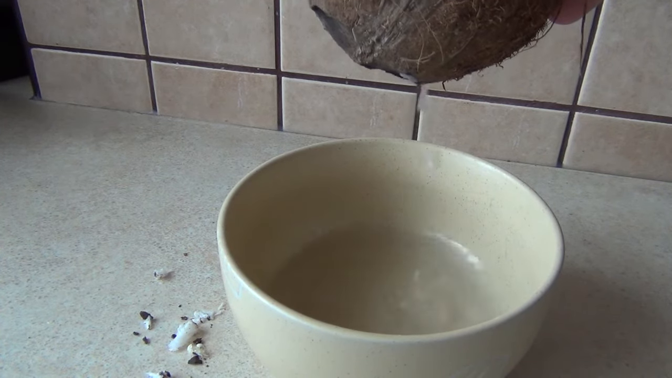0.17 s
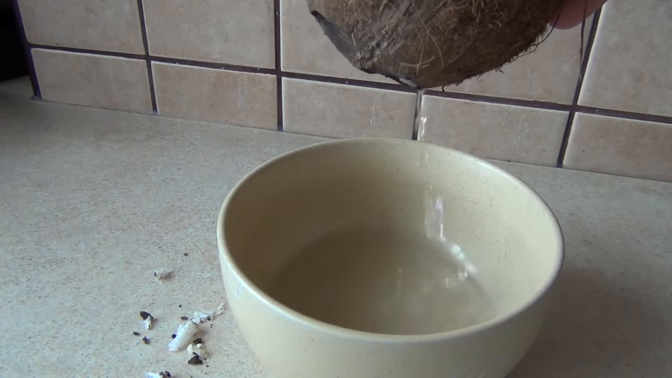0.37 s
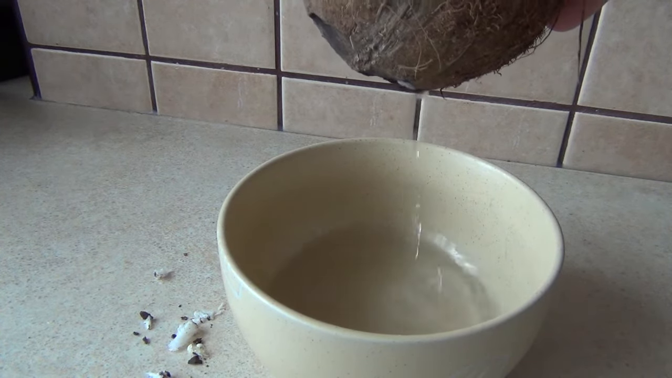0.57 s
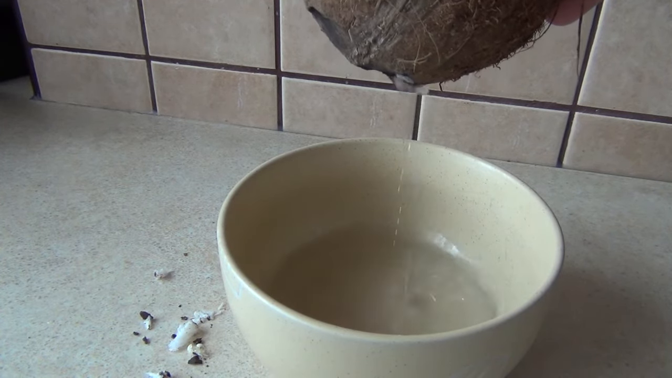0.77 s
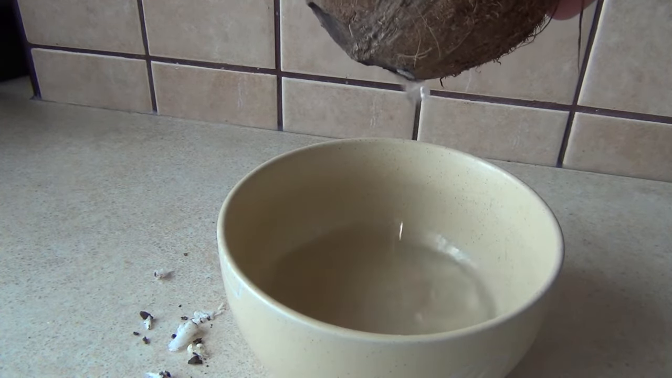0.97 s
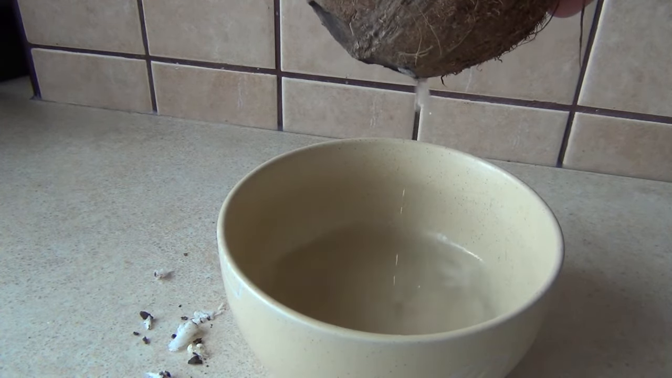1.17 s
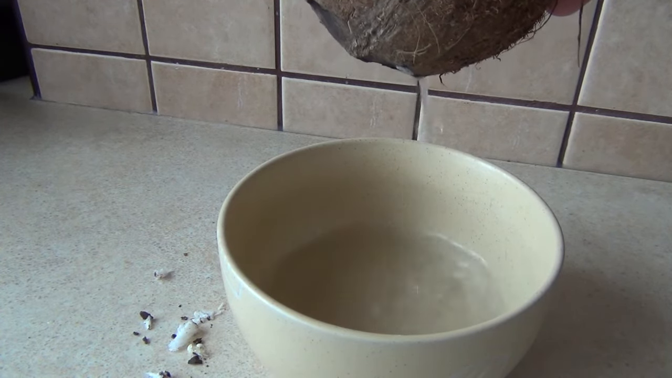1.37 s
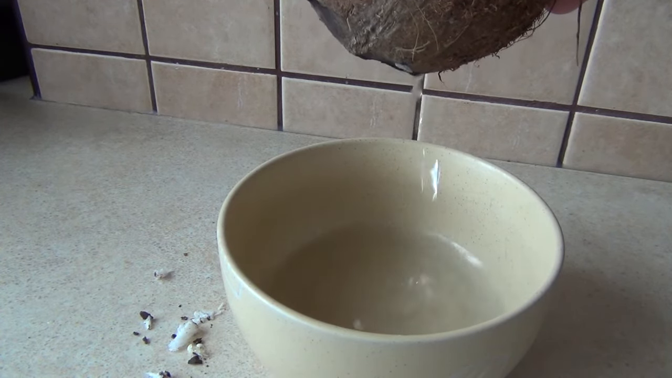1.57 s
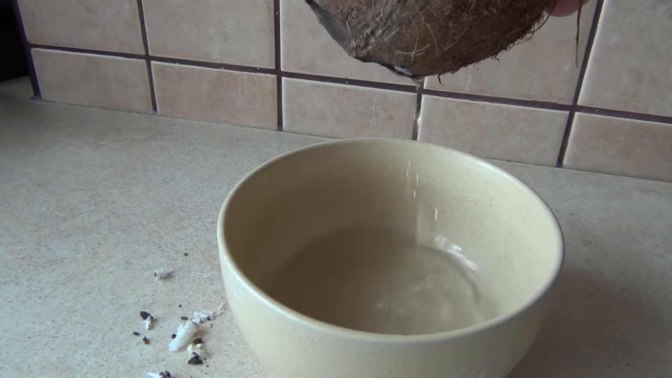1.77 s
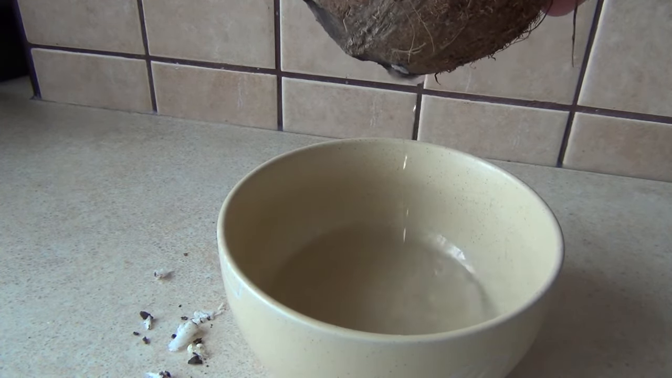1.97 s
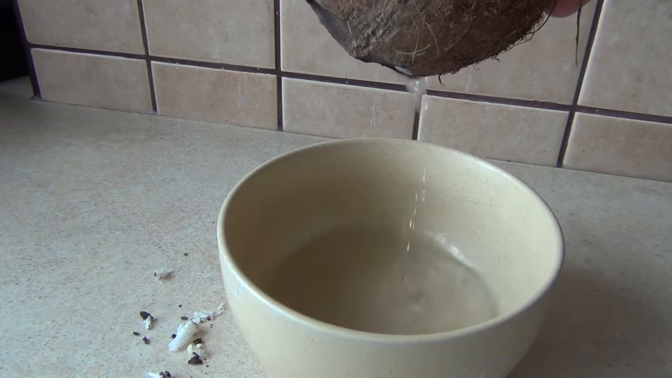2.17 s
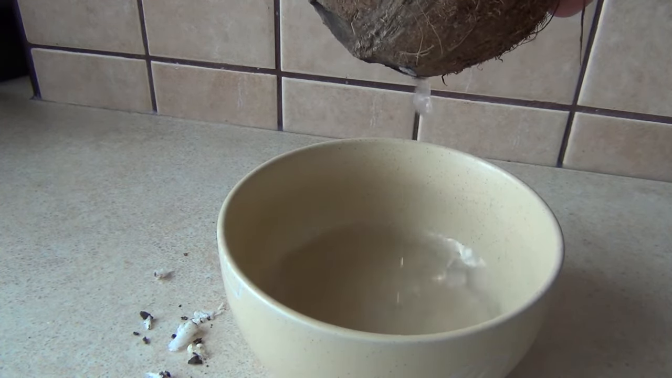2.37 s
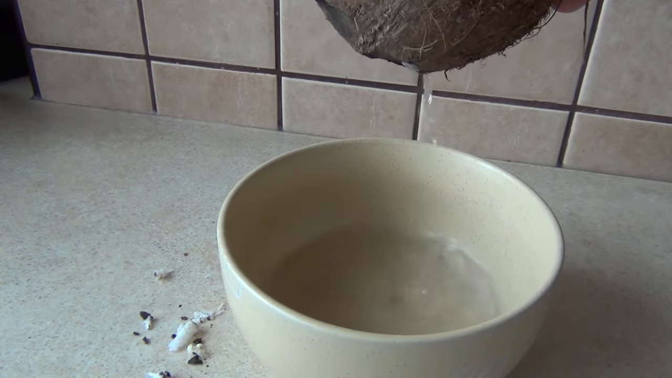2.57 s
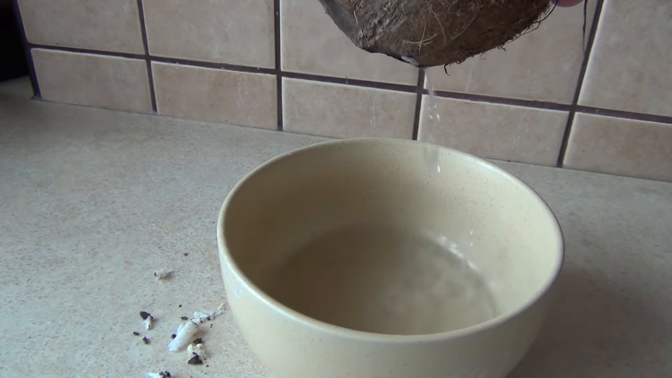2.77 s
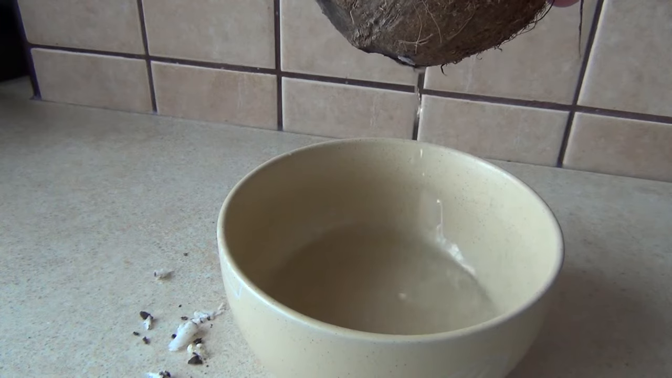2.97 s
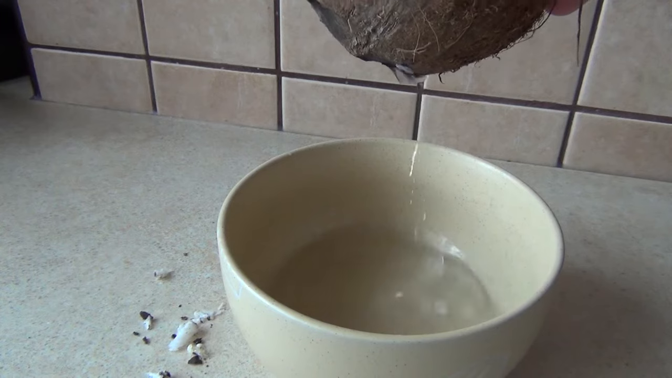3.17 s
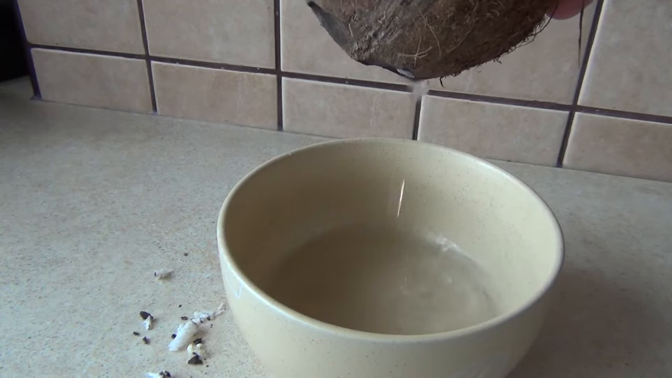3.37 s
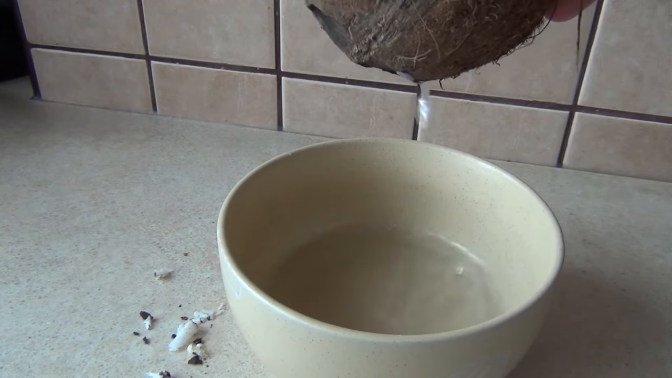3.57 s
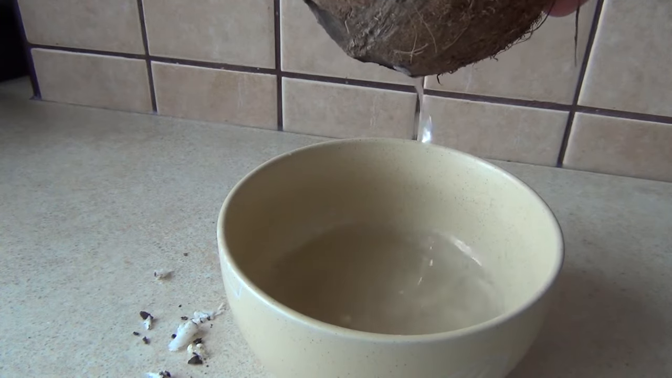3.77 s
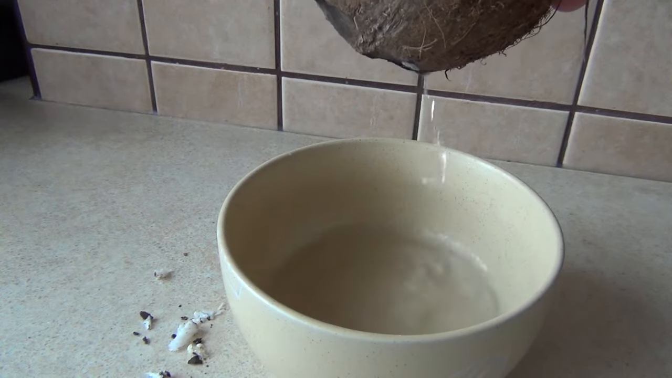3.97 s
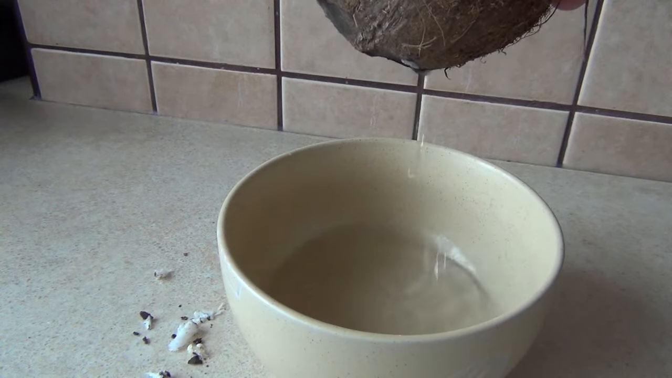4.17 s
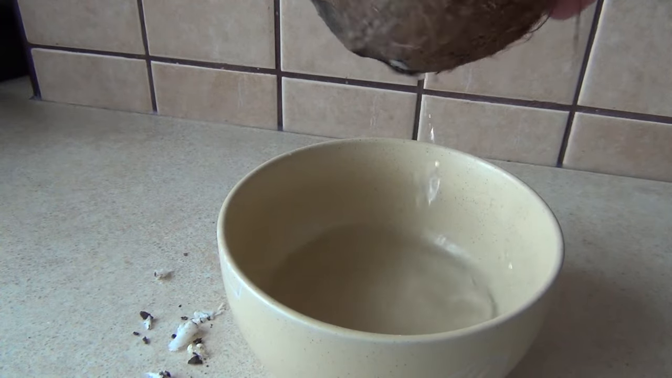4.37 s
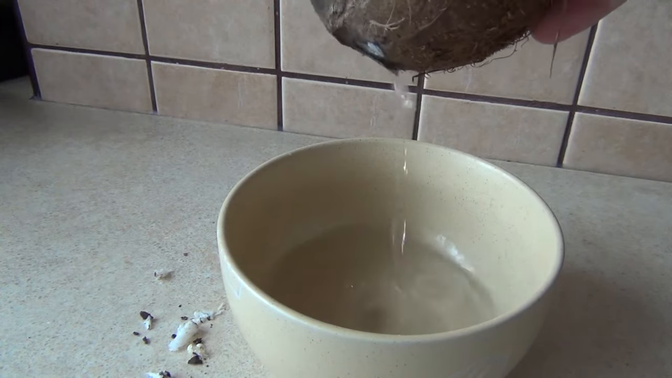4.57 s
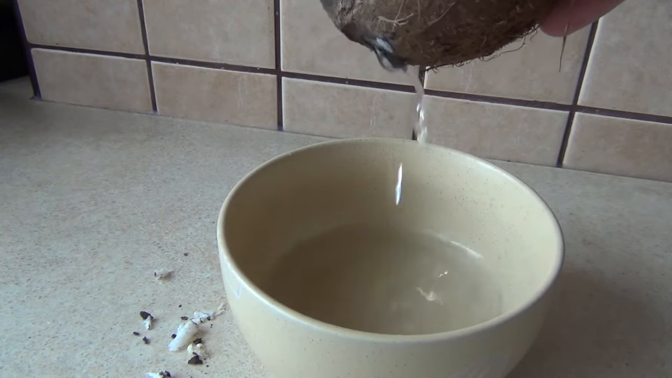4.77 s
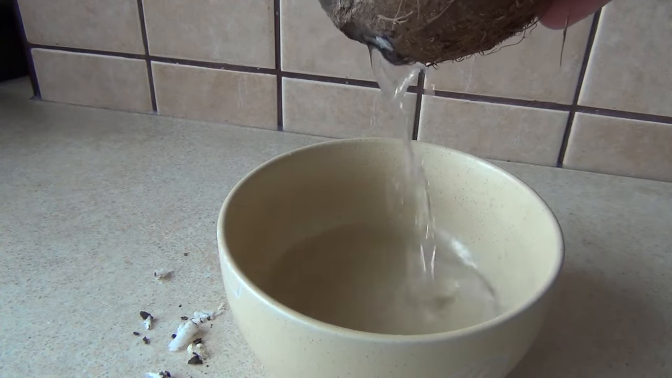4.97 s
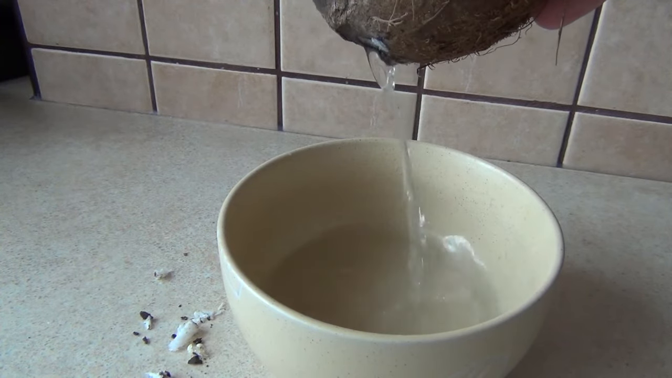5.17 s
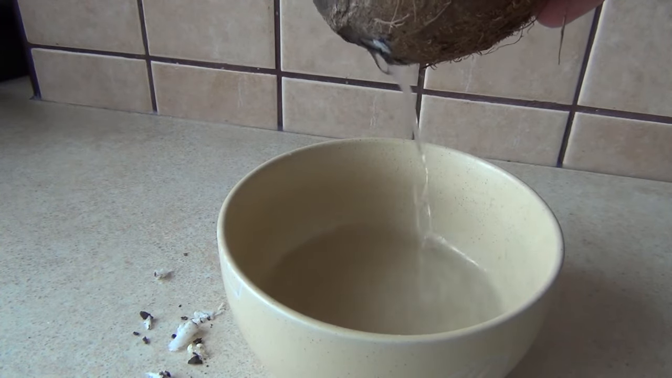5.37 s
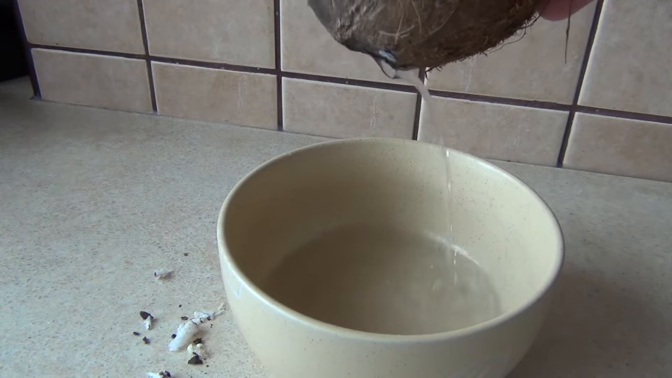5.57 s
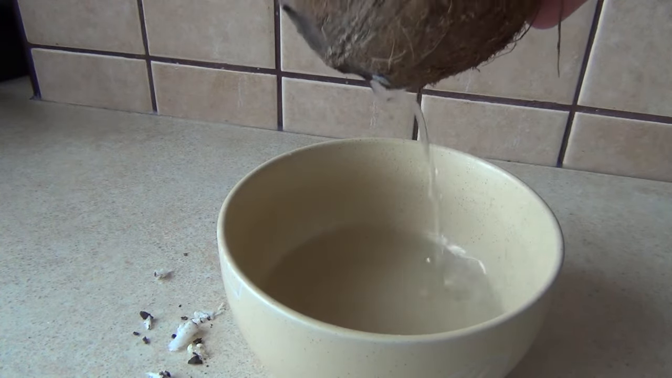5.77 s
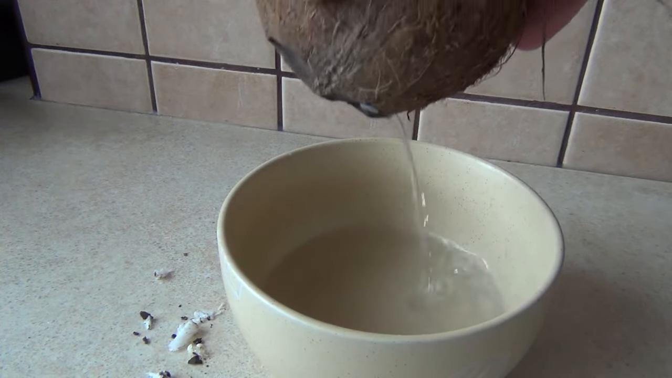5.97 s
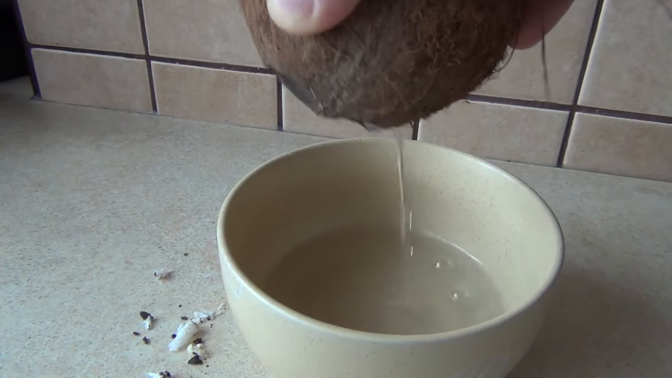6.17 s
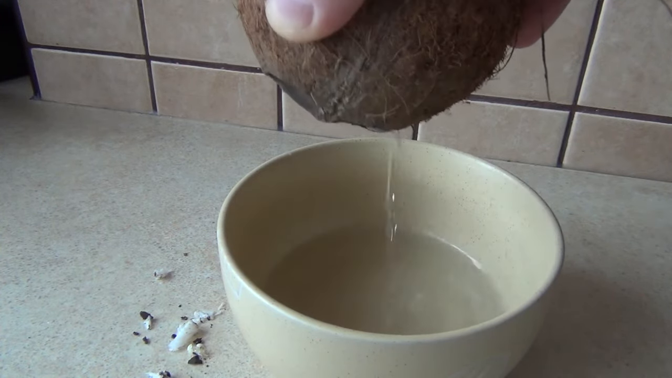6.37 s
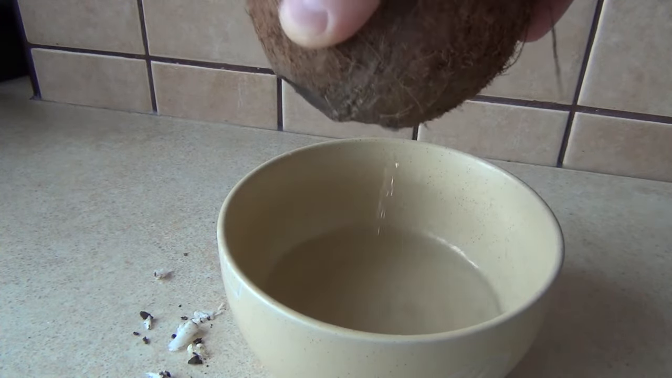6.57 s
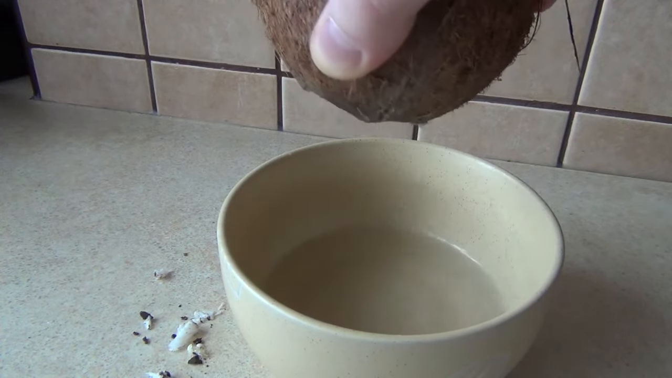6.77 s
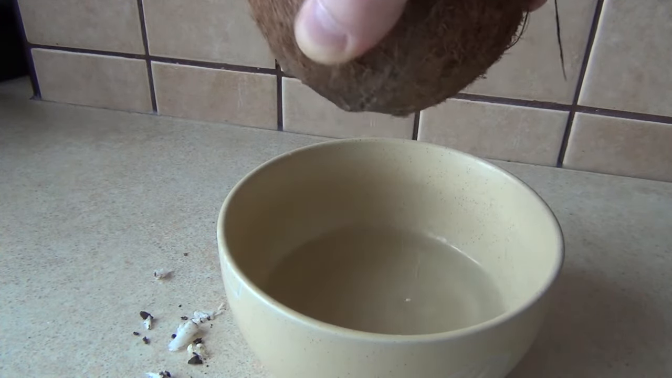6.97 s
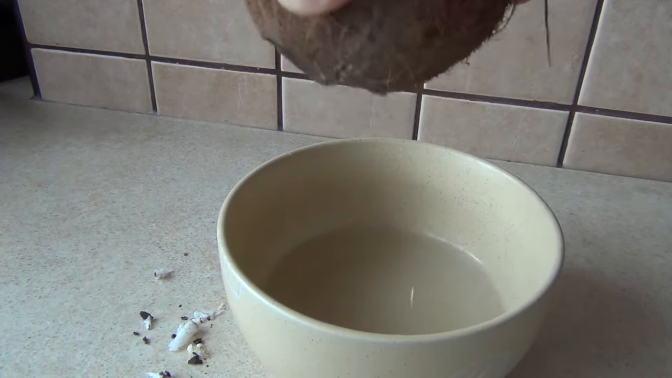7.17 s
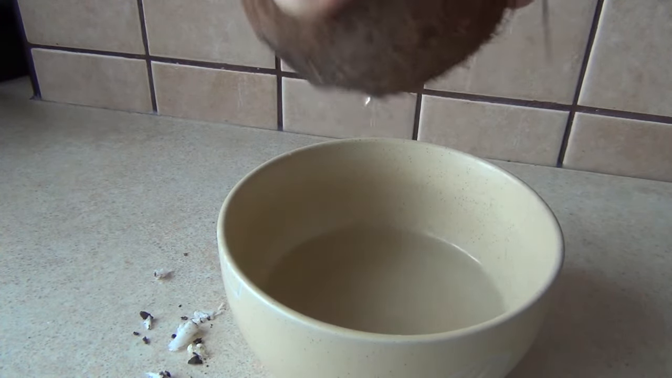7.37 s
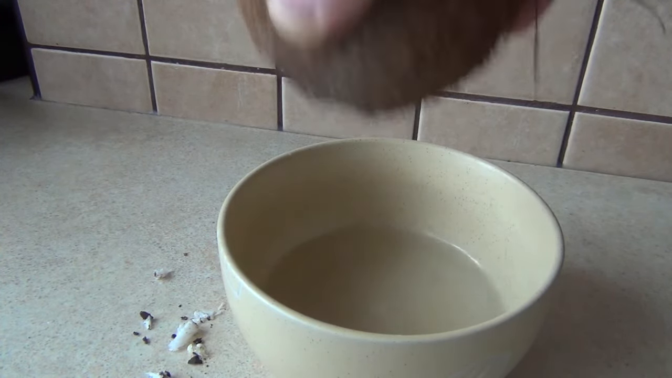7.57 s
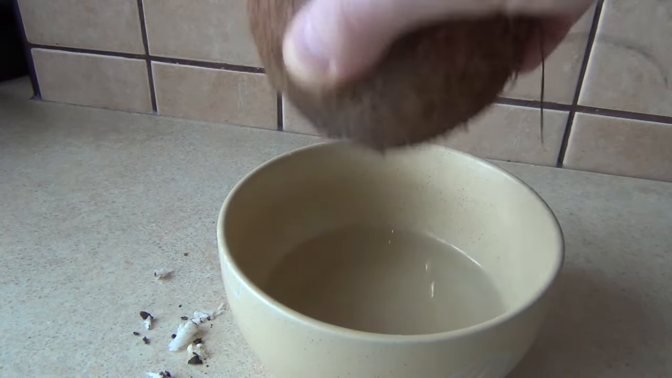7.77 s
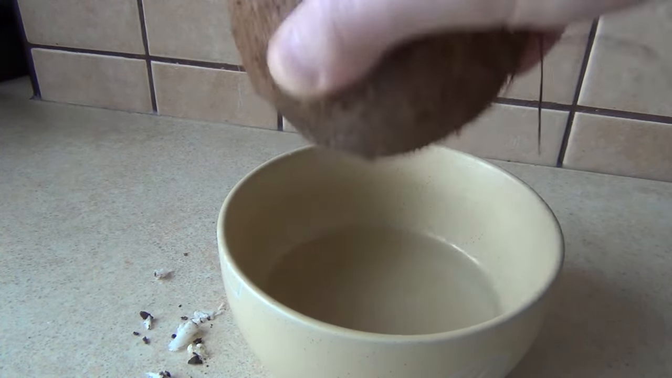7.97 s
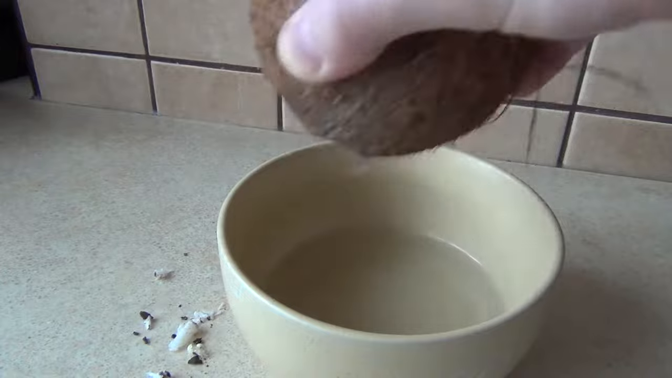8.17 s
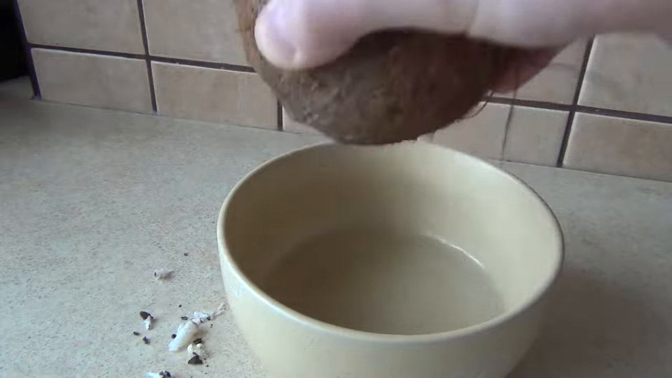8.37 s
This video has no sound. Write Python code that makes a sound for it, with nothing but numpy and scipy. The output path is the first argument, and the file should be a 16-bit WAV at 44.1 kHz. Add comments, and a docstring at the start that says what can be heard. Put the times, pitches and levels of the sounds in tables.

```python
"""Coconut water drips from a pierced shell into a ceramic bowl on a kitchen counter, runs as a thin stream, then drips
until the shell is empty. Drops are short rising slaps; trapped bubbles are decaying sines that climb in pitch.
Resonators ring the air in the bowl, decaying sines its glazed wall (pinged by stray droplets) and the knocking
hand-held shell; filtered noise makes the churn, the grip, the still air and the faint camera whirr.
Close by in a small tiled room, on a two-sided microphone."""
import sys
import numpy as np
from scipy import signal
from scipy.fft import rfft, irfft
from scipy.io import wavfile

SR = 44100
rng = np.random.default_rng(int(sys.argv[2]) if len(sys.argv) > 2 else 0)


def to_wav(s):
    """Save 16-bit WAV."""
    ch = np.atleast_2d(s).T  # columns
    pcm = np.round(np.clip(ch, -1, 1) * 32767)  # PCM
    wavfile.write(sys.argv[1], SR, pcm.astype(np.int16))


N = 371322  # length in samples
T = np.arange(N) / SR  # time/s
LEFT_MINUS_RIGHT = np.array([[1], [-1]])  # signs of a side signal in the two channels


def undb(db):
    """Decibels to gain."""
    return 10 ** (np.asarray(db) / 20)


def level(x, db):
    """Scale to an rms level."""
    return x * undb(db) / np.sqrt(np.mean(x ** 2))


def add(track, s, sound):
    """Mix a short sound in at time s."""
    i = int(np.clip(s * SR, 0, N - 1))
    track[i:i + len(sound)] += sound[:N - i]


def band(x, lo_hz, hi_hz):
    """Second-order band-pass."""
    sos = signal.butter(2, [lo_hz, min(hi_hz, SR / 2 - 1)], "band", fs=SR, output="sos")
    return signal.sosfilt(sos, x)


def resonate(x, hz, width):
    """One resonance, gain 1 at its centre; width in Hz."""
    return signal.lfilter(*signal.iirpeak(hz, hz / width, fs=SR), x)


def fade(t, t60):
    """Exponential decay by 60 dB in t60 seconds."""
    return np.exp(-np.log(1000) * t / t60)


def noise(points):
    """Noise with a given (Hz, dB) spectrum, interpolated over log frequency."""
    hz, db = np.transpose(points)
    bins_hz = np.arange(N // 2 + 1) * SR / N
    gain = undb(np.interp(np.log(bins_hz + 1), np.log(hz), db))
    return irfft(rfft(rng.standard_normal(N)) * gain, N)


def between(ends, share):
    """A pitch part of the way between two ends, in octaves."""
    return ends[0] * (ends[1] / ends[0]) ** share


def scatter(sound, db, t60=0.022):
    """Short waves bounce about inside the bowl, differently from every spot on the surface."""
    t = T[:SR // 40]
    echoes = band(rng.standard_normal(len(t)), 2600, 14500)
    echoes *= fade(t, t60) * (1 - np.exp(-(t / 0.00026) ** 2))
    echoes *= undb(db) / np.linalg.norm(echoes)
    echoes[0] += 1  # the direct sound
    return signal.fftconvolve(sound, echoes)


# spectrum of the still air in the quiet kitchen: f/Hz, relative level/dB per Hz
STILL_AIR = [(20, -22), (38, 2), (52, 1), (80, 6.5), (130, 11.5), (280, 3), (400, 4.5), (520, -2),
             (800, 3.5), (3000, -3.5), (6000, -4.5), (7500, -8), (11500, -8.5), (15600, -11), (17000, -36)]


def room_tone():
    """Still air as shaped noise, and a faint wavering hum of narrow noise that sinks away near the end."""
    air = level(noise(STILL_AIR), -60)
    hum = resonate(resonate(rng.standard_normal(N), 199, 8.5), 199, 8.5)
    hum = level(hum, -69.0) * undb(np.interp(T, [7.9, 8.1], [0, -12]))
    side_spectrum = [(20, -25), (60, 9), (150, 5), (400, 0.5), (900, -3.5), (2000, -12.5), (4400, -22.5),
                     (5300, -15), (7500, -8), (9000, -10.5), (15000, -66)]
    side = level(noise(side_spectrum), -71.0)
    return air + hum + (side - undb(-9) * hum) * LEFT_MINUS_RIGHT


# resonances of the camera's whirring body:
# f/Hz, width/Hz before broadening, relative level/dB, share of the power that pulses [0-1]
WHIRR_MODES = [(652, 86, 7.5, 0), (862, 150, 14.5, 0), (1073.4, 53, 13, 0.04), (1174, 36, 7, 0),
               (1857, 102, 6, 0.23), (2105, 153, 0, 0.06), (2627, 26, 3.5, 0.86), (2774, 260, -4, 1),
               (3603, 240, -2, 0.3), (3975, 65, 2, 1), (4900, 52, -6, 0.4), (5090, 210, -5.5, .8),
               (5320, 44, 1.5, 0.98)]


def whirr(pulse_hz=25, pulse_s=0.0023, width_db=-19, broadening=1.34):
    """The camera's mechanism hisses through its body resonances, the upper ones mostly in a regular flutter."""
    pulses = np.exp(-(T % (1 / pulse_hz)) / pulse_s)
    pulses = np.roll(level(pulses, 0), int(.016 * SR))
    out = np.zeros((2, N))
    for hz, width, db, share in WHIRR_MODES:
        share = np.clip(share, 0, 1)
        drive = rng.standard_normal((2, N)) * np.sqrt(1 - share + share * pulses ** 2)
        # two passes narrow the peak, so each is broadened
        once = resonate(drive, hz, broadening * width)
        out += undb(db) * resonate(once, hz, broadening * width)
    mid, side = level(out, -56.5)
    return mid + undb(width_db) * side * LEFT_MINUS_RIGHT


# a bubble that lasts about RISE_CYCLES climbs half of CLIMB_OCTAVES, longer-lived ones nearly all of it
CLIMB_OCTAVES, RISE_CYCLES, RISE_SPREAD_CYCLES, CLIMB_CURVE = 2, 34, 5.8, 1.74


def bubble(birth_hz, life_ms, damping=.95, damping_per_octave=0.36, attack_share=0.015, wobble=0.065):
    """A trapped bubble rings and dies; the more cycles it lasts, the nearer the heaving surface and the higher it climbs."""
    t = T[:int(life_ms * SR / 1000)]
    age = t / t[-1]  # 0 at birth, 1 at death
    cycles = t[-1] * birth_hz
    climb = CLIMB_OCTAVES / (1 + np.exp((RISE_CYCLES - cycles) / RISE_SPREAD_CYCLES))
    # the surface heaves at random, swaying pitch and strength
    heave = np.interp(age, np.linspace(0, 1, num=7), rng.standard_normal(size=7))
    hz = birth_hz * 2 ** (climb * age ** CLIMB_CURVE) * (1 + wobble * heave * age)
    swell = 1 - np.exp(-age / attack_share)
    decay = np.exp(-(damping + damping_per_octave * climb) * age) * (1 - age ** 4)
    ring = np.sin(2 * np.pi * np.cumsum(hz) / SR)
    return ring * swell * decay * undb(2 * heave * age)


def splash(hz, t60=0.029):
    """The collapsing crater rasps briefly around the pitch of its bubble."""
    t = T[:SR // 40]
    rasp = level(band(rng.standard_normal(len(t)), 0.91 * hz, 1.2 * hz), 0)
    return rasp * fade(t, t60) * (1 - np.exp(-t / 0.00028))


# the clearest trapped bubbles: t/s, level/dB before the bowl, f/Hz at birth, life/ms
CLEAR_BUBBLES = [(.002, -36.5, 3650, 5.3), (0.7193, -43, 4920, 3.1), (.869, -46, 4730, 6.2),
                 (1.3898, -35, 3590, 4.8), (1.6344, -33, 6220, 2.6), (1.9413, -19, 3760, 6.1),
                 (1.9432, -23.5, 4730, 3.7), (1.976, -40, 5200, 6), (3.2722, -33, 3890, 3.2),
                 (3.6248, -29, 4220, 6), (4.692, -33.5, 3640, 5), (4.9877, -24.5, 4110, 2.5),
                 (5.0723, -24, 2020, 8.5), (5.143, -26.5, 1676, 11), (5.1473, -18, 3870, 1.6),
                 (5.199, -31, 1267, 17), (5.2204, -18.5, 5700, 1.3), (5.2212, -26, 2130, 2.4),
                 (5.224, -23.5, 3600, 5.2), (5.233, -36, 4100, 6.5), (5.263, -35, 1990, 7.1),
                 (5.27, -30, 3500, 7), (5.296, -22.5, 4854, 4.1), (5.2947, -31, 1520, 13.4),
                 (5.324, -21.5, 1587, 14), (5.3236, -23.5, 3760, 5.7), (5.3956, -15, 1008, 5.7),
                 (5.403, -22.5, 1150, 22), (5.419, -25.5, 925, 32.5), (5.421, -28.5, 2820, 9.8),
                 (5.429, -25.5, 1246, 20), (5.445, -25, 1400, 13), (5.455, -30, 3030, 8.7),
                 (5.531, -29.5, 3183, 6), (5.5702, -22, 1247, 27), (5.6665, -25.5, 1960, 11.4),
                 (5.6743, -12.5, 5350, 2.25), (5.701, -31.5, 950, 19), (5.7235, -29, 886, 29),
                 (5.739, -31, 1372, 22), (5.781, -23.5, 1565, 15), (5.7829, -15, 1950, 3),
                 (5.818, -20, 2860, 10), (5.833, -21, 2005, 7.1), (5.849, -22.5, 1693, 10.8),
                 (5.899, -21, 890, 26), (5.939, -25, 905, 51), (5.9941, -29, 904, 27.4),
                 (6.0275, -31, 4470, 3.1), (6.0434, -31.5, 795, 29.6), (6.0845, -24, 2040, 8.2),
                 (6.0849, -14.5, 5230, 0.88), (6.095, -32, 1437, 25), (6.1662, -26, 3840, 8.6),
                 (6.217, -31.5, 930, 28.4), (6.2476, -33.5, 3480, 6.5), (6.301, -35, 3740, 8.5),
                 (6.358, -20.5, 2028, 7.5), (6.3675, -26, 1940, 3.2), (6.3723, -36, 4150, 5.9)]


def bubbles(rasp_db=-12, twin_db=-13, twin_ratio=1.22, twin_life=0.58):
    """The plinks and gurgles; small bubbles come with more splash than big ones, and split off a smaller twin."""
    out = np.zeros(N)
    for s, db, birth_hz, life_ms in CLEAR_BUBBLES:
        smallness = min(birth_hz / 3200, 1)
        ring = bubble(birth_hz, life_ms)
        twin = undb(twin_db) * smallness * bubble(twin_ratio * birth_hz, twin_life * life_ms)
        add(out, s, undb(db + rasp_db) * smallness * splash(birth_hz))
        add(out, s, undb(db) * scatter(ring, db=-10))
        twin_delay_s = rng.uniform(0, 0.4) * len(ring) / SR
        add(out, s + twin_delay_s, undb(db) * twin)
    return out


def tick(hz, swell_s=0.0001, snap=0.21, climb_s=0.02):
    """A slap of a few rising cycles, on top of the sharp pressure step of first contact."""
    t = T[:SR // 300]
    u = t / (swell_s * undb(rng.uniform(-4.0, 2.9)))  # every slap has its own length
    rising_s = t + (t - 2 * swell_s) ** 2 / (2 * climb_s)
    phase = 2 * np.pi * hz * rising_s + rng.uniform(0, 2 * np.pi)
    slap = (u / 2) ** 2 * np.exp(2 - u) * np.sin(phase)
    return slap + snap * np.exp(-t / .00004)


# faint droplets fall until the shell is empty: loudest level/dB before the bowl, spread/dB below it, f/Hz, end/s
DROPLET_DB, DROPLET_SPREAD_DB, DROPLET_HZ, EMPTY_S = -45, 4, (4700, 11800), 6.6


def droplets(count=36):
    """Tiny splashes fall back at random moments, as faint slaps with a stronger snap and scatter."""
    out = np.zeros(N)
    for when, colour, size in rng.random((count, 3)):
        db = DROPLET_DB - DROPLET_SPREAD_DB * np.sqrt(size)
        slap = tick(between(DROPLET_HZ, colour), snap=0.44)
        add(out, EMPTY_S * when, undb(db) * scatter(slap, db=4.5))
    return out


# the clearest drops hitting the surface: t/s, level/dB before the bowl, centre f/Hz of the tick
CLEAR_DROPS = [(.1708, -32, 11000), (.3316, -40.5, 8200), (0.4484, -37.5, 4750), (.6826, -36.5, 8000),
               (.7246, -29, 11600), (.8683, -32, 9700), (1.0315, -40.5, 7600), (1.2236, -39, 9800),
               (1.633, -28.5, 9250), (1.9175, -18, 10900), (1.9416, -25.5, 10200), (2.2945, -32, 11000),
               (2.7745, -31.5, 11400), (3.003, -29, 9000), (3.0162, -25, 14000), (3.12, -37, 10600),
               (3.2652, -26.5, 9700), (3.2928, -25.5, 10500), (3.624, -21.5, 9960), (3.835, -25.5, 11200),
               (4.0957, -36, 5700), (4.1447, -37.5, 10800), (4.2973, -32.5, 12100), (4.59, -35.5, 5370),
               (4.753, -17.5, 10900), (4.8175, -34.5, 11700), (5.0058, -21.5, 12000), (5.0202, -27, 10400),
               (5.0713, -24.5, 9700), (5.1102, -16, 11500), (5.129, -28, 9750), (5.143, -26, 10700),
               (5.18, -18, 9200), (5.1887, -10, 10400), (5.221, -10.5, 10300), (5.296, -19, 8900),
               (5.3077, -16, 10900), (5.324, -11.5, 9540), (5.3364, -21, 10700), (5.3819, -14.5, 11800),
               (5.4568, -11.5, 9900), (5.498, -17.5, 9200), (5.5283, -20.5, 11600), (5.5941, -7.5, 9600),
               (5.6582, -12.5, 9300), (5.6768, -12, 9400), (5.7756, -20.5, 9800), (5.8165, -9.5, 6200),
               (5.833, -16.5, 10100), (5.8468, -15, 9460), (6.0267, -7, 8780), (6.0717, -20, 13600),
               (6.084, -16, 8120), (6.0898, -9.5, 10900), (6.1665, -6.5, 9400), (6.264, -26.5, 10400),
               (6.3121, -17.5, 9360), (6.324, -19, 11300), (6.3597, -21.5, 10100), (6.533, -28, 11100),
               (6.5758, -22, 10300), (6.6133, -27, 9600)]


def drops():
    """Drops slap the surface of the pool, and the bowl scatters each tick."""
    out = np.zeros(N)
    for s, db, hz in CLEAR_DROPS:
        add(out, s, undb(db) * scatter(tick(hz), db=-6))
    return out


# droplets flung against the wall of the bowl: t/s, level/dB before the snap and mode gains
WALL_DROPLETS = [(0.521, -61), (1.8496, -51.5), (1.9177, -52), (2.595, -58), (2.9447, -53), (3.0144, -51.5),
                 (3.176, -63), (3.787, -64), (4.026, -61.5), (4.7525, -53), (5.916, -47), (6.248, -53)]
# ringing of the glazed wall: f/Hz, t60/s, level/dB relative to the hit, before a random offset
GLAZE_MODES = [(4585, 0.053, 4), (10500, 0.041, 8.5), (12900, 0.038, 0), (14400, .04, -3)]


def wall(snap_db=10):
    """Droplets snap against the ceramic and set it ringing; each spot favours other modes."""
    out, t = np.zeros(N), T[:SR // 10]
    for s, db in WALL_DROPLETS:
        add(out, s, undb(db + snap_db) * tick(5400, snap=1.0))
        for hz, t60, mode_db in GLAZE_MODES:
            gain = undb(db + mode_db + 2 * rng.standard_normal())
            add(out, s, gain * np.sin(2 * np.pi * hz * t) * fade(t, t60))
    return out


# dull knocks of the shell in the hand: t/s, level/dB before attack and decay, f/Hz
SHELL_KNOCKS = [(.867, -55, 184), (3.744, -47, 109), (4.089, -49, 102), (4.468, -46, 130),
                (4.584, -41, 169), (4.745, -30, 198)]
KNOCK_T60_S = 0.12


def shell():
    """Damped low knocks of the hollow shell, each a decaying sine with a soft attack."""
    out, t = np.zeros(N), T[:SR // 3]
    for s, db, hz in SHELL_KNOCKS:
        envelope = fade(t, KNOCK_T60_S) * (1 - np.exp(-t / 0.0029))
        add(out, s, undb(db) * np.sin(2 * np.pi * hz * t) * envelope)
    return out


# strength of the stream through the pour: t/s, relative level/dB
STREAM_FLOW = [(5.0, -41), (5.131, -1.5), (5.22, 4), (5.45, 7), (5.65, 6), (5.85, 3), (6.05, -4.5),
               (6.33, -5.5), (6.45, -14)]


def in_stream(share):
    """A moment part of the way through the pour, and the strength of the stream then in dB."""
    flow_s, flow_db = np.transpose(STREAM_FLOW)
    s = flow_s[0] + share * (flow_s[-1] - flow_s[0])
    return s, np.interp(s, flow_s, flow_db)


# fine spray and fizz at 0 dB of flow, before the bowl: loudest level/dB, spread/dB below it, range of f/Hz
SPRAY_TICK_DB, SPRAY_BLIP_DB, SPRAY_SPREAD_DB = -25.5, -36, 17
SPRAY_TICK_HZ, SPRAY_BLIP_HZ = (5260, 12600), (1392, 5780)


def spray(count=130):
    """The stream throws off fine droplets that tick, louder as it swells."""
    out = np.zeros(N)
    for when, colour, size in rng.random((count, 3)):
        s, flow_db = in_stream(when)
        db = SPRAY_TICK_DB + flow_db - SPRAY_SPREAD_DB * np.sqrt(size)
        add(out, s, undb(db) * scatter(tick(between(SPRAY_TICK_HZ, colour)), db=-1.5))
    return out


def fizz(count=480, cycles=14):
    """The stream whips in many tiny, short-lived bubbles, louder as it swells."""
    out = np.zeros(N)
    for when, pitch, size, life in rng.random((count, 4)):
        s, flow_db = in_stream(when)
        hz = between(SPRAY_BLIP_HZ, pitch)
        life_ms = 1000 * cycles * (.5 + life) / hz
        db = SPRAY_BLIP_DB + flow_db - SPRAY_SPREAD_DB * np.sqrt(size)
        add(out, s, undb(db) * bubble(hz, life_ms))
    return out


# the hand shifts its grip on the shell: t/s, noise level/dB before the swell, time to the peak/s
GRIP_S, GRIP_DB, GRIP_SWELL_S = 7.565, -49, 0.034


def grip():
    """Fingers drag over the husk: a low rumble that swells and dies away."""
    u = np.maximum(T - GRIP_S, 0) / GRIP_SWELL_S
    rumble = noise([(20, -20), (65, -5), (180, 1), (250, -17), (900, -54)])
    return level(rumble, GRIP_DB) * u * np.exp(1 - u)


# resonances of the air in the bowl: f/Hz, width/Hz, level/dB before the coupling gain
BOWL_MODES = [(882, 52, 3), (1140, 22, -1.5), (1237, 4.4, -4), (1373, 8.2, 0), (1510, 34, -50),
              (1818, 42, 1), (2013, 90, -1), (2170, 40, 2), (3080, 72, -12), (4463, 48, 4.5),
              (5840, 340, -1)]


def bowl(x, direct_db=-2, coupling_db=3):
    """The sound that comes straight over the rim plus the ring of the air in the bowl."""
    ring = sum(undb(db) * resonate(x, hz, width) for hz, width, db in BOWL_MODES)
    return undb(direct_db) * x + undb(coupling_db) * ring


def churn(water):
    """Each splash also pushes the pool, a soft low thud: noise that follows the strength of the water."""
    power = signal.lfilter([1 / 600], [1, 1 / 600 - 1], water ** 2)  # smoothed over 600 samples
    push = np.sqrt(np.abs(power))
    thud = noise([(30, -27), (90, -16), (160, 4.5), (280, -7), (420, -2.5), (700, -9.5), (1500, -10), (5000, -58)])
    return push * level(thud, -26)


def kitchen(x, wet_db=-16, t60=0.22, width_db=-11, bass_hz=420, bass_lean_db=-11):
    """A small tiled room, heard almost alike on both sides; bass leans right, treble tells the two ports apart."""
    t = T[:SR // 2]
    tails = band(rng.standard_normal((2, len(t))), 110, 13200)
    tails = tails * fade(t, t60) * (1 - np.exp(-t / 0.0012))
    # the tiles behind the bowl strengthen the reflected treble
    tails = tails + undb(-10) * band(tails, 1600, 5500)
    mid, side = (signal.fftconvolve(x, undb(wet_db) * h / np.linalg.norm(h))[:N] for h in tails)
    treble_sos = signal.butter(1, [5000, 10000], "band", fs=SR, output="sos")
    treble = signal.sosfiltfilt(treble_sos, x)
    bass = signal.sosfiltfilt(signal.butter(2, bass_hz, fs=SR, output="sos"), x)
    # the slope of the treble acts as a small time difference between the ports
    side = undb(width_db) * side + undb(-14.5) * np.gradient(treble) - undb(bass_lean_db) * bass
    return x + mid + side * LEFT_MINUS_RIGHT


def scene(pool_low_hz=160):
    """Water in the bowl and the shell above it, in the kitchen; small drops and bubbles give off little bass."""
    pool = drops() + bubbles() + spray() + fizz() + droplets()
    pool = signal.sosfilt(signal.butter(1, pool_low_hz, "high", fs=SR, output="sos"), pool)
    water = bowl(pool) + wall()
    in_room = kitchen(water + churn(water) + shell() + grip())
    return in_room + room_tone() + whirr()


def record(dry, top_hz=16800):
    """The camera cuts the top of the treble with a steep low-pass."""
    return signal.sosfilt(signal.ellip(10, .2, 80, top_hz, fs=SR, output="sos"), dry)


dry = scene()
out = record(dry)
to_wav(out)
```